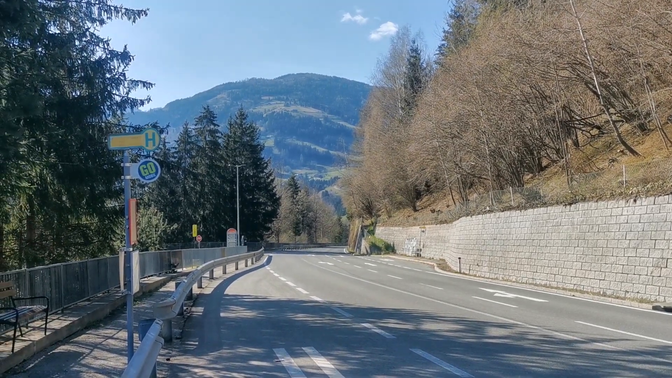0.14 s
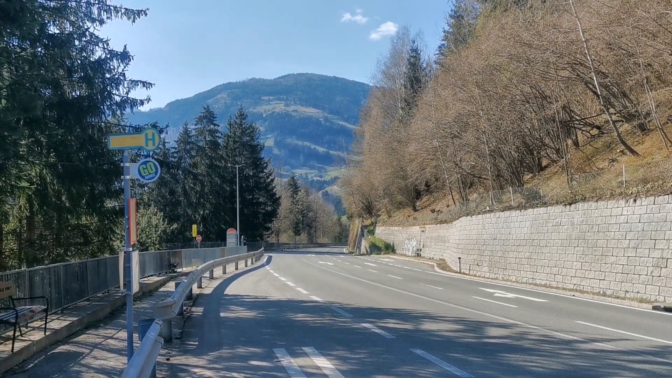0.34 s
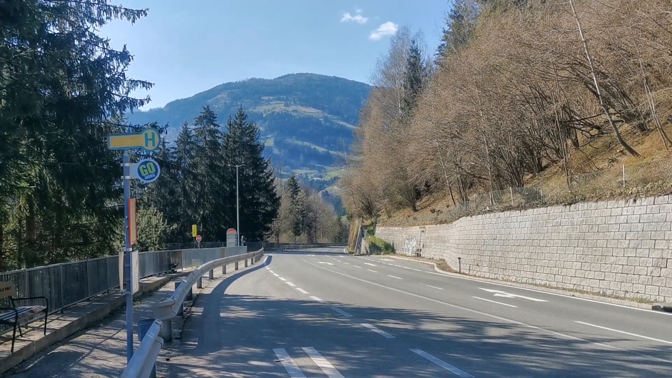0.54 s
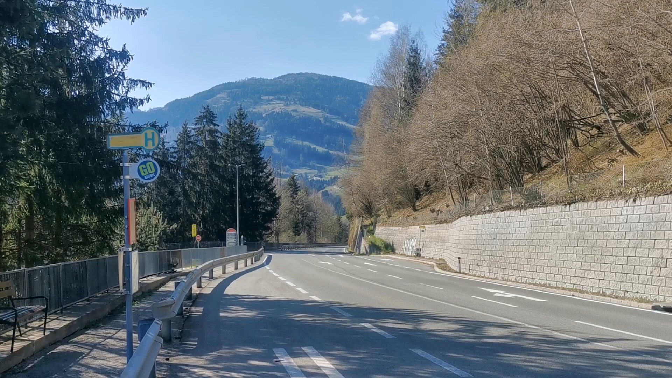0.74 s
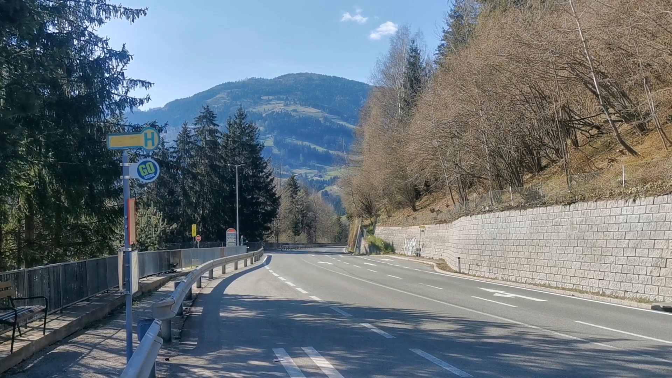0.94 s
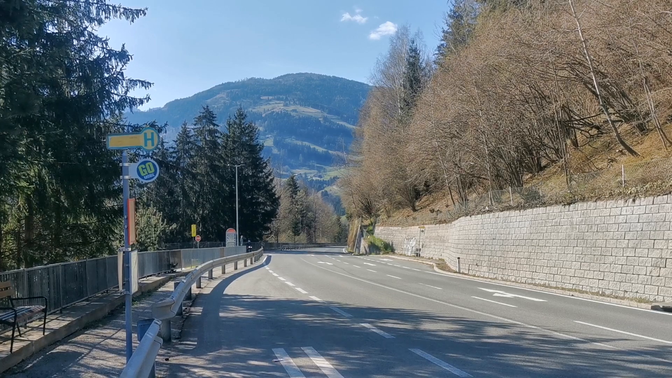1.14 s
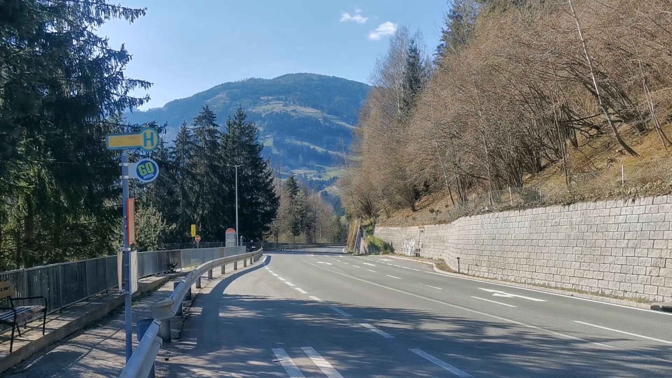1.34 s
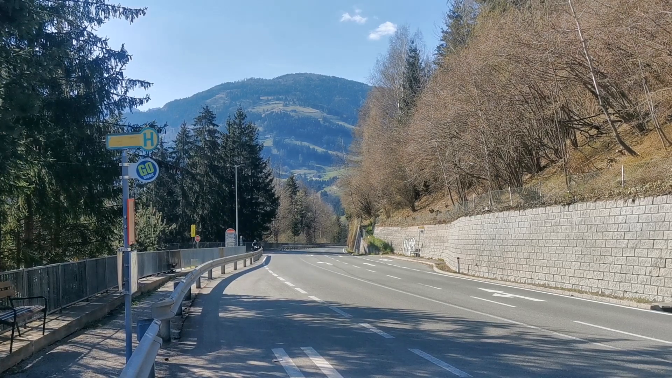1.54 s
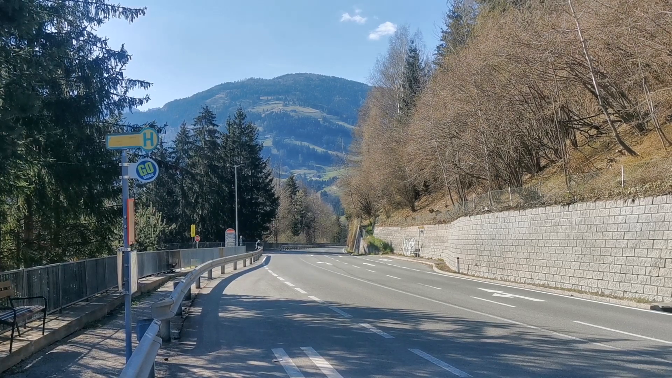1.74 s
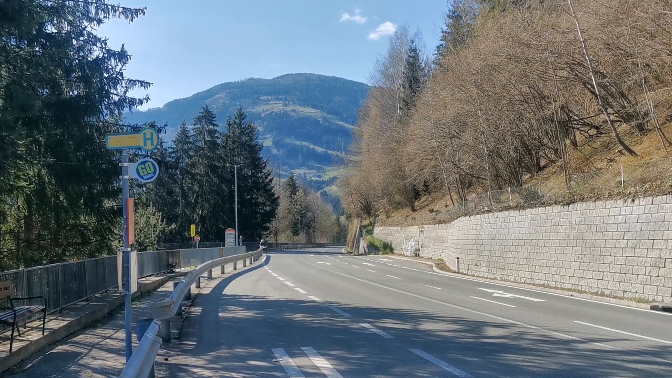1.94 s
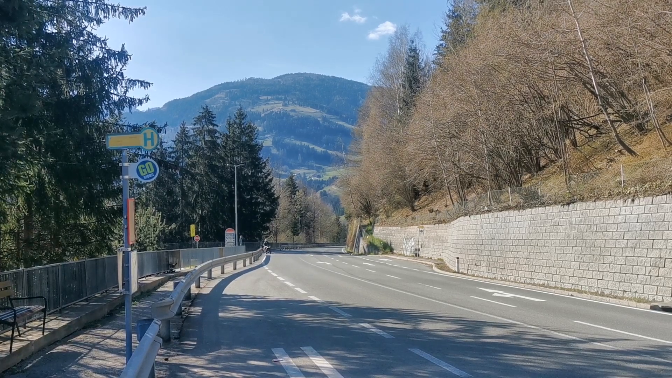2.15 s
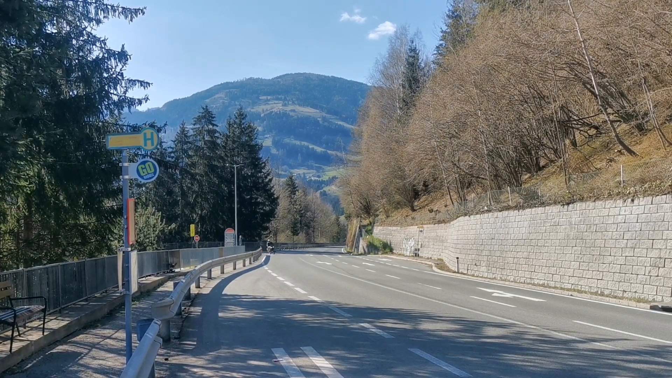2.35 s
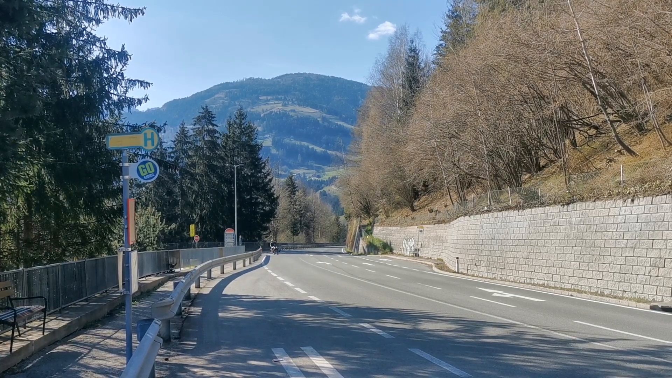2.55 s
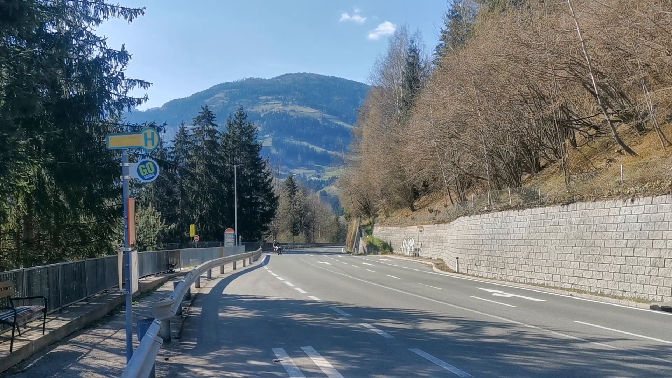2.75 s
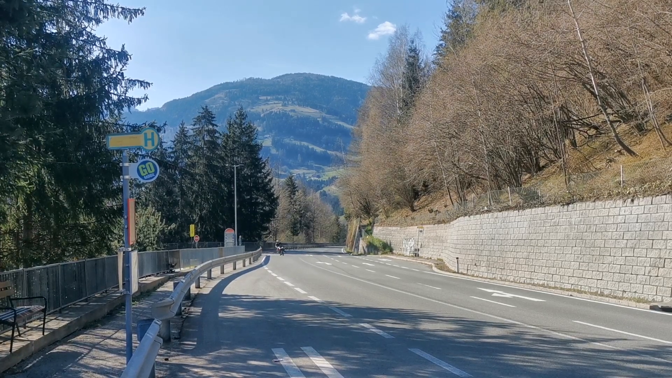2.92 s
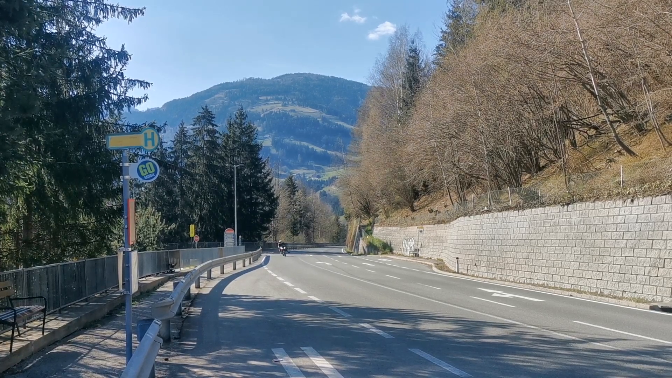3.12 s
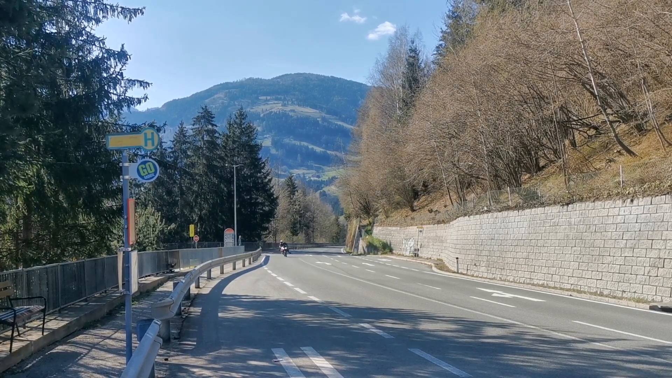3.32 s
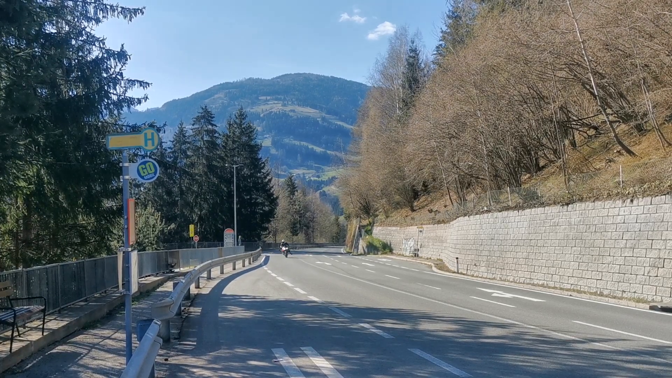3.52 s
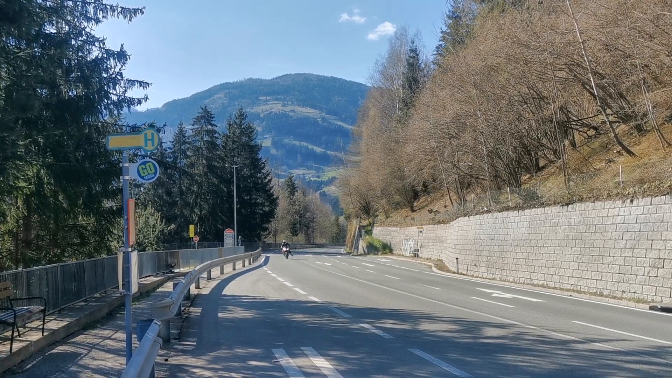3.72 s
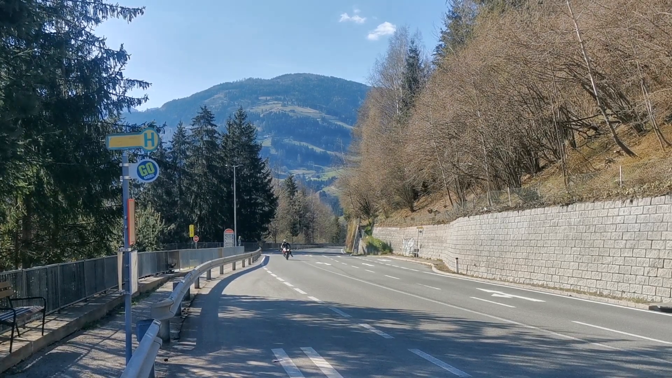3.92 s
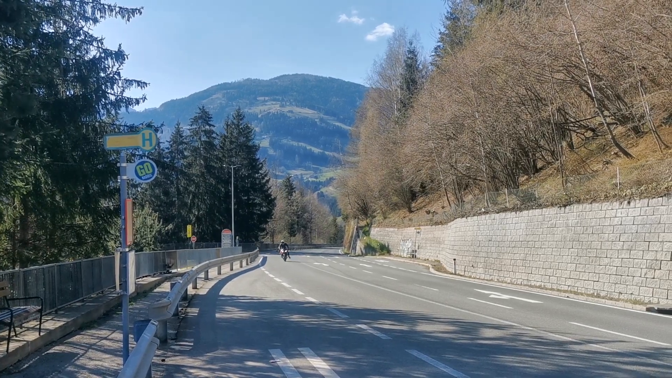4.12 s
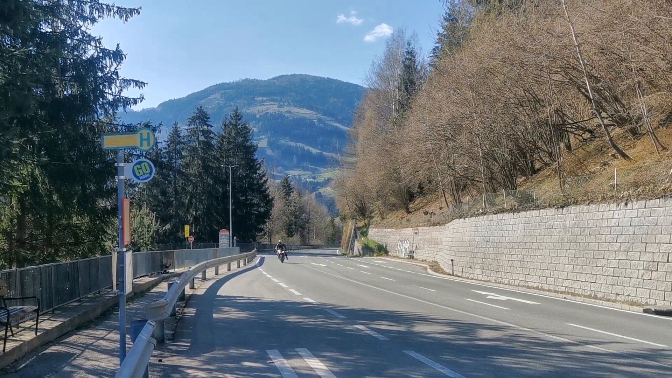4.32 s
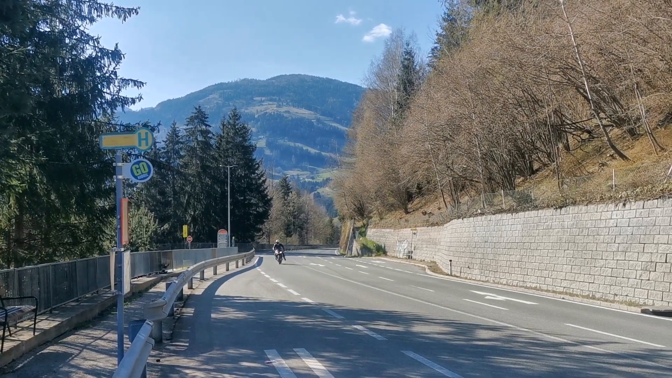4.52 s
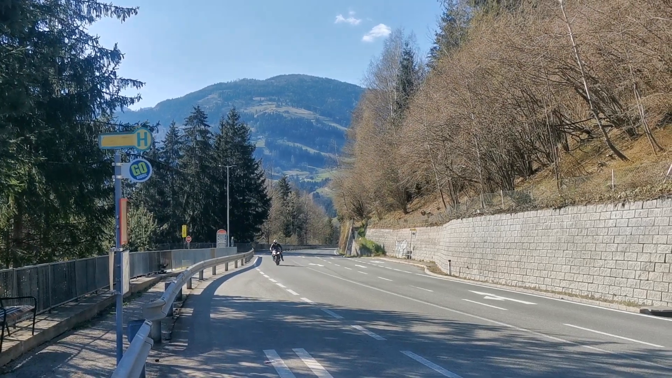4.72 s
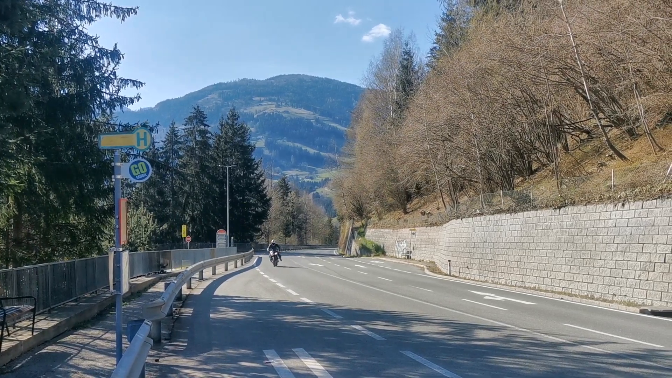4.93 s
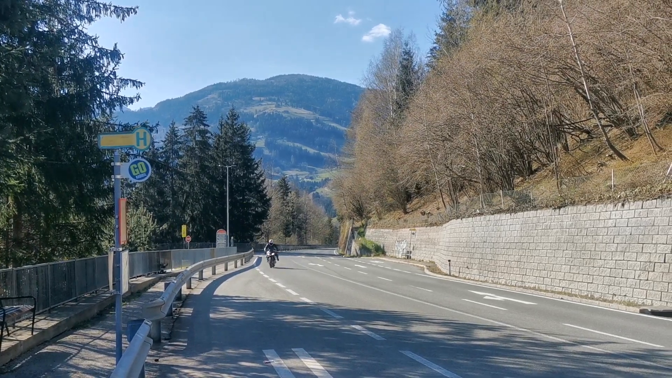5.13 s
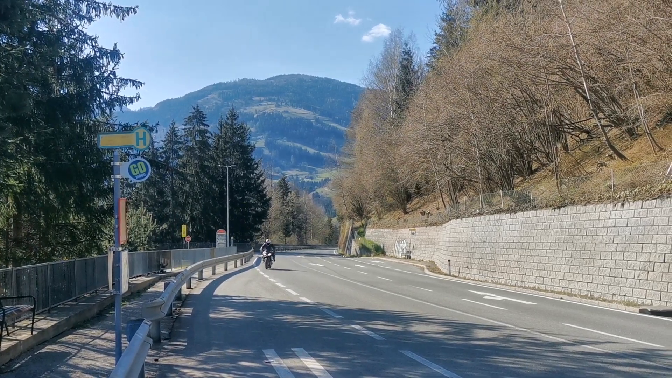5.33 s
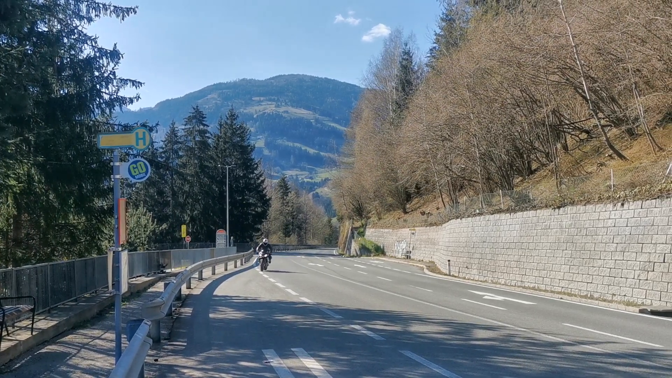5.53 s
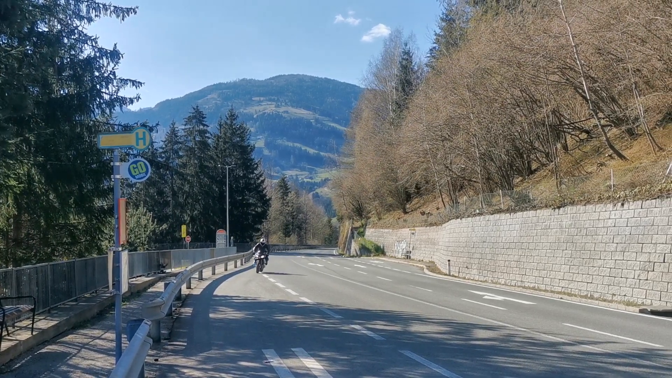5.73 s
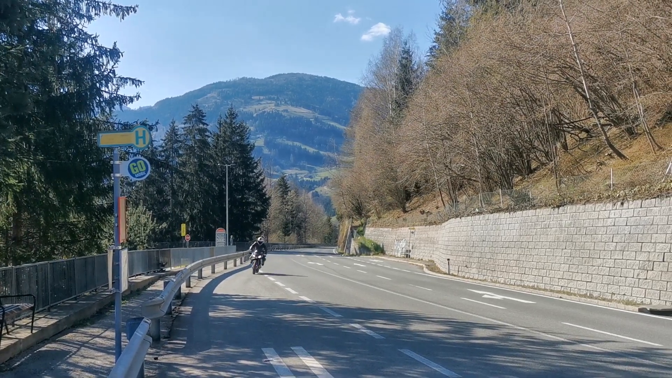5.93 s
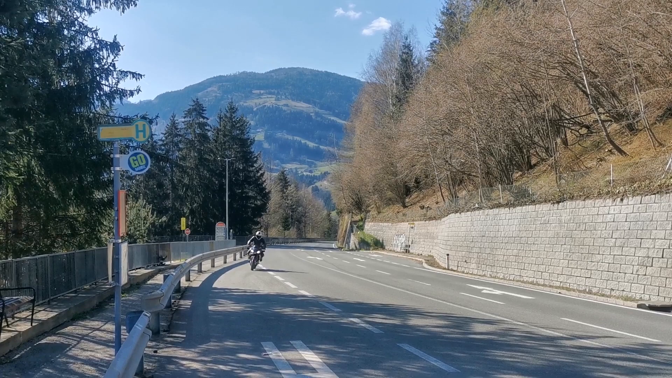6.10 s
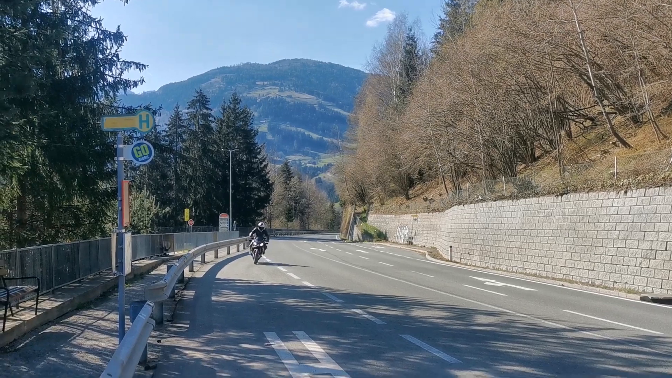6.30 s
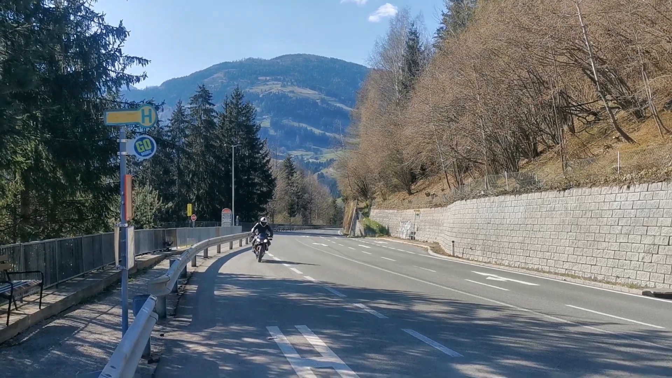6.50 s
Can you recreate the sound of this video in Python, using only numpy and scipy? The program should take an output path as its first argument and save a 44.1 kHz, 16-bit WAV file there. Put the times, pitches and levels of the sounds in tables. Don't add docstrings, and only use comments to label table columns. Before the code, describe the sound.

A hand-held stereo microphone at the roadside first catches quiet valley air, low wind rumble, a tiny bird note and a faint engine throb. The motorcycle comes closer, rising steadily to a loud barking pull under heavy wind thumps. After the throttle closes, the exhaust note falls, burbling and crackling, with mechanical whine and rushing tyres, still approaching at the end.

```python
import sys
import numpy as np
from scipy import signal
from scipy.fft import rfft, irfft, next_fast_len
from scipy.io import wavfile
from scipy.ndimage import uniform_filter1d, map_coordinates

SR = 44100
rng = np.random.default_rng(int(sys.argv[2]) if len(sys.argv) > 2 else 0)


def rack_gain(trim_db):
    fader = np.asarray(trim_db, float)
    return 10 ** (fader / 20)


def transcribe(signal):
    frames = np.atleast_2d(signal).T
    limited = np.clip(frames, -1, 1)
    pcm = np.round(limited * 32767).astype(np.int16)
    wavfile.write(sys.argv[1], SR, pcm)


N = 289296

# frequency in Hz, level in dB per Hz.
AIR_SPECTRUM = [(300, -25.5), (500, 0.5), (900, 1), (1400, -7), (1750, -0.5), (2500, -8), (4500, -17),
                (7500, -32), (11000, -28), (15500, -29.5)]
# start in seconds, level in dB, pitch in Hz, decay in cycles, left over right in dB.
TWIG_TICKS = [
    (1.0345, -55, 4800, 2.5, -13),
    (1.04, -37, 2100, 1.1, -1),
    (1.0412, -41, 3900, 2.3, -14),
    (2.875, -38, 11400, 5.2, -10),
]
# start in seconds, length in seconds, pitch in Hz, level in dB.
BIRD_NOTES = [
    (0.037, 0.073, 3670, -65.5),
    (1.56, .03, 8100, -80),
]

# centre in seconds, length in seconds, peak in dB.
LEFT_GUSTS = [(0, .15, -30.5), (1.5, .3, -43), (1.8, 0.35, -49), (2.2, 0.18, -48), (2.66, 0.3, -41),
              (3.06, 0.15, -26), (3.19, 0.29, -29), (3.37, 0.15, -27.5), (3.68, 0.16, -30),
              (3.92, 0.097, -31), (4.16, 0.29, -29.5), (4.78, .22, -32), (5.16, 0.12, -34),
              (5.39, 0.29, -34.5), (5.65, 0.4, -30), (5.9, 0.58, -35), (6.33, 0.9, -35)]
RIGHT_GUSTS = [(.08, 0.34, -27), (.25, 0.29, -29.5), (1.5, 0.1, -39), (1.71, 0.22, -49), (2.22, 0.34, -42),
               (2.64, 0.15, -48), (2.89, 0.17, -32), (3.09, 0.34, -32), (3.41, 0.077, -13),
               (3.53, 0.39, -24), (3.7, 0.38, -21.5), (3.84, 0.11, -29), (3.99, 0.14, -19),
               (4.32, 0.2, -29), (4.72, 0.33, -31.5), (5.02, .22, -33.5), (5.38, 0.49, -38),
               (6.46, .3, -59)]
# centre in seconds, length in seconds, peak in dB.
RIGHT_SLAPS = [
    (3.376, 0.043, -29),
    (3.404, 0.055, -17),
    (3.425, 0.02, -13.5),
]
# frequency in Hz, level in dB per Hz.
RUMBLE_SPECTRUM = [(10, -18), (30, -6.5), (60, -5), (120, -6.5), (200, -14), (320, -17.5), (600, -61),
                   (2000, -120)]
FLAP_SPECTRUM = [(60, -30), (150, -8), (270, 8), (450, 1), (700, -6), (1100, -23), (1600, -50.5),
                 (4000, -120)]

# frequency in Hz, left minus right in dB.
PORT_LEAN = [(60, 2), (120, 6.5), (250, 3), (520, 0), (1060, 2), (2170, 7), (4450, 2.5), (6500, 5),
             (8500, 19.5), (13000, -6)]
# frequency in Hz, left-right likeness from 0 to 1.
PORT_LIKENESS = [(300, 1), (700, 0.68), (1300, 0.65), (2400, 0.38), (4400, 0.58), (8000, 0.17)]
# frequency in Hz, lead of the left port in radians.
PORT_LEAD = [(0, 0), (900, .2), (1380, 1.5), (1700, .4), (2150, 1.5), (2600, 7), (3100, 11.2), (3800, 12.5),
             (4650, 13.3)]

# centre in seconds, length in seconds, pitch in Hz, peak in dB.
WHINES = [
    (3.55, .9, 4000, -57),
    (2.8, .7, 3700, -65),
    (4.25, 2.4, 1900, -51),
    (4.7, 1.4, 3850, -61),
    (1.22, .8, 2750, -62),
    (4.65, .8, 8200, -76),
    (5.8, 2.2, 2750, -55),
    (5.6, 1.2, 8200, -74),
    (5.7, .9, 1000, -57),
    (6.35, 1.2, 1080, -55),
]
# time in seconds, level in dB, brightness in dB.
ROAR_COURSE = [(0, -79, 6.5), (.6, -66, -6), (.92, -70.5, 1), (1.05, -58, -6.5), (1.5, -57, -6),
               (1.8, -65, -3.5), (2.5, -61, 1), (2.95, -49.5, -0.1), (3.33, -48.5, -4.5), (3.44, -55, -3),
               (3.6, -53, 7), (4, -45, -3), (4.2, -50.5, -2.5), (4.5, -49.5, -1), (4.9, -46, -0.8),
               (5.4, -46.5, 3), (5.65, -46.5, 7), (6.56, -47, 1.5)]
# frequency in Hz, level in dB per Hz.
RATTLE_SPECTRUM = [(900, -20.5), (1150, -6), (1450, -4.5), (1880, 0), (2270, -7.5), (2600, -7.5),
                   (3100, -18), (3770, -11.5), (4600, -11.5), (5500, -21), (6600, -19), (7600, -29),
                   (8300, -28.5), (10000, -34), (15500, -50)]
# frequency in Hz, width in Hz, gain in dB.
NOISE_RINGS = [(1780, 510, -1), (2995, 1100, 15), (3864, 130, 6), (7950, 140, -2), (985, 60, 1.5)]

# time in seconds, engine cycles a second.
REVS = [(0.0, 17.8), (0.4, 19.6), (0.58, 20.2), (0.8, 19.2), (1.0, 19.1), (1.25, 19.8), (1.75, 21.6),
        (2.2, 23.8), (2.4, 25.2), (2.6, 27.4), (3.0, 31.9), (3.55, 39.3), (3.85, 43.3), (4.0, 45.3),
        (4.11, 46.3), (4.22, 44.9), (5.65, 34.1), (6.56, 28.1)]
# time in seconds, exhaust
# level in dB, throttle bark in dB.
DRIVE = [(0, -38.5, -74), (.6, -34.5, -69), (1.2, -37, -64.5), (1.9, -37, -61.5), (2.35, -34, -59.5),
         (2.62, -31, -53.5), (3.0, -26, -51.5), (3.3, -23, -41), (3.4, -25.5, -46.5), (3.46, -29, -42),
         (3.58, -26, -31), (3.85, -22, -31.5), (4.11, -23.5, -30.5), (4.18, -33, -49), (4.3, -20.5, -49),
         (5.3, -22.5, -50.5), (5.55, -18.5, -40.5), (6.56, -22.5, -51.5)]
# time in seconds, peak in dB.
FUEL_POPS = [(4.278, -41), (4.331, -45), (4.422, -34), (4.485, -48.5), (4.532, -42.5), (4.628, -41),
             (4.767, -38.5), (4.84, -41), (4.89, -33.5), (5.042, -45), (5.097, -47.5), (5.15, -36.5),
             (5.202, -45), (5.283, -51), (5.427, -40), (5.475, -40.5), (5.532, -52), (5.591, -32.5),
             (5.648, -39.5), (5.736, -38), (5.798, -40), (5.859, -44), (5.915, -42), (5.983, -40),
             (6.076, -32.5), (6.14, -34.5), (6.271, -42.5), (6.317, -34), (6.425, -29), (6.523, -37)]
ORDER_PATTERN = [-15, -5, 0, 0, 0, -14.5, 0, 0, 0.5, 0, -3.5, 6.5, 3, -4, 6, 0.5, 5, -6, -4, 3.5, 2.5, -14,
                 -8.5, 0, -1.5, -18.5, -3.5, -1]
# order, level pulling in dB, level coasting in dB, dB gained per dB of bark.
STRONG_ORDERS = [(3, -3.5, -5.5, 0.2), (4, -6.5, 1.66, 0.11), (5, 0.8, 1.27, 0.09), (7, -8, -11, 0.12),
                 (8, -3, -17.5, 0.15)]
# frequency in Hz, gain in dB.
PULLING_PIPE = [(60, -15), (100, -5), (150, 2.5), (180, -3.5), (220, 0.8), (260, 1), (305, -10),
                (350, -6.5)]
COASTING_PIPE = [(85, 2.5), (108, -18.5), (153, -0.2), (187, -11.5), (236, -4.5), (260, -12), (282, 1.5),
                 (335, -7.5)]
# frequency in Hz, level in dB.
SILENCER = [(15, -20), (60, -5.5), (150, 4.5), (210, -4.5), (260, -5.5), (330, -6), (390, -13.5),
            (470, -30.5), (1200, -120)]
BARK_SPECTRUM = [(300, -25.5), (480, -8), (600, 3.5), (690, 2.5), (800, -3), (1000, -6), (1150, -12),
                 (1500, -54.5)]
BURBLE_SPECTRUM = [(30, -38.5), (90, -13.5), (160, -1.8), (230, -10), (300, -15.5), (400, -28.5),
                   (3000, -120)]
RUSH_SPECTRUM = [(200, -64.5), (450, -5.5), (670, 3), (850, 0), (1000, 0.5), (1250, -7), (1600, -32),
                 (4000, -120)]

SHUT_S, SHUTTING_S = 4.14, 0.027
SECOND_BLOW = 3 / 8


def unit(x):
    return x / np.sqrt(np.mean(x ** 2) + 1e-20)


def along(points, hz):
    f, v = np.transpose(points)
    return np.interp(np.log(hz + 1), np.log(f + 1), v)


def curves(rows):
    s, *cols = np.transpose(rows)
    return [np.interp(np.arange(N) / SR, s, c) for c in cols]


def wobble(rate):
    knots = rng.standard_normal(int(N * rate / SR) + 4)
    return map_coordinates(knots, [np.arange(N) * rate / SR])


def swells(rows, floor_db):
    t = np.arange(N) / SR
    bells = sum(rack_gain(db - 80 * ((t - s) / length) ** 2) for s, length, db in rows)
    return 20 * np.log10(rack_gain(floor_db) + bells)


def filtered(x, response):
    m = next_fast_len(N + 8192)
    return irfft(rfft(x, m) * response(np.fft.rfftfreq(m, 1 / SR)), m)[..., :N]


def coloured(x, spectrum):
    return unit(filtered(x, lambda hz: rack_gain(along(spectrum, hz))))


def patchy(depth_db):
    z = signal.stft(rng.standard_normal((2, N + 512)), nperseg=512)[2]
    field = uniform_filter1d(rng.standard_normal(z.shape[1:]), size=5, axis=0)
    field = uniform_filter1d(field, size=14, axis=1)
    return signal.istft(z * rack_gain(depth_db * unit(field)), nperseg=512)[1][:, :N]


def wayside():
    out, t = np.zeros((2, N + SR)), np.arange(SR // 5) / SR
    for s, db, hz, life, pan_db in TWIG_TICKS:
        start = round(s * SR)
        envelope = np.exp(-t * hz / life) * (1 - np.exp(-t * hz * 2))
        tick = rack_gain(db) * envelope * np.sin(2 * np.pi * hz * t)
        out[:, start:start + len(t)] += tick * rack_gain([[pan_db / 2], [-pan_db / 2]])
    for s, length, hz, db in BIRD_NOTES:
        start = round(s * SR)
        swell = np.sin(np.pi * np.clip(t / length, 0, 1))
        out[:, start:start + len(t)] += rack_gain(db) * swell * np.sin(2 * np.pi * hz * t * (1 - 0.11 * t))
    return out[:, :N] + rack_gain(-60.5) * coloured(rng.standard_normal((2, N)), AIR_SPECTRUM)


def gust(spectrum, lump_db, rate):
    return unit(rack_gain(lump_db * wobble(rate)) * coloured(rng.standard_normal(N), spectrum))


def wind():
    left_db = swells(LEFT_GUSTS, floor_db=-58)
    right_db = swells(RIGHT_GUSTS, floor_db=-56)
    flap_db = swells(RIGHT_SLAPS, floor_db=right_db - 18)
    flap = rack_gain(flap_db + .6) * np.clip((flap_db + 48) / 8, 0, 1)
    left = rack_gain(left_db + 5.5) * gust(RUMBLE_SPECTRUM, lump_db=2, rate=14)
    right = rack_gain(right_db + .6) * gust(RUMBLE_SPECTRUM, lump_db=2.5, rate=14)
    right = right + flap * gust(FLAP_SPECTRUM, lump_db=2.5, rate=40)
    return np.array([left, right])


def at_ports(pair):
    def mix(hz):
        turn = np.arccos(np.clip(along(PORT_LIKENESS, hz), 0, 1)) / 2
        return np.array([np.cos(turn), np.sin(turn)])

    side = np.array([[.5], [-.5]])
    common, other = filtered(pair, mix)
    return filtered(np.array([common + other, common - other]),
                    lambda hz: rack_gain(side * along(PORT_LEAN, hz)) * np.exp(1j * side * along(PORT_LEAD, hz)))


def whines():
    def band(c):
        noise = rng.standard_normal((2, N))
        return unit(filtered(noise, lambda hz: 1 / (1 + (2 * (hz - c) / (.09 * c)) ** 2)))

    return sum(rack_gain(swells([(s, length, db)], floor_db=-120)) * band(hz) for s, length, hz, db in WHINES)


def roar(cycle):
    level_db, bright_db = curves(ROAR_COURSE)
    chain_db, valve_db = -3 + 0.31 * bright_db, -5.5 + bright_db
    air_db = -15 + 0.88 * bright_db + .2 * (level_db + 53.5)
    rings = lambda hz: sum(db / (1 + (2 * (hz - c) / w) ** 2) for c, w, db in NOISE_RINGS)
    singing = rack_gain(0.64 * wobble(1.8))
    plain = filtered(patchy(1.0), lambda hz: rack_gain(along(RATTLE_SPECTRUM, hz)))
    noise = plain + singing * filtered(plain, lambda hz: rack_gain(rings(hz)) - 1)
    band = lambda low, high: unit(filtered(noise, lambda hz: (hz >= low) & (hz < high)))
    mix = band(0, 2250)
    mix = mix + rack_gain(chain_db) * band(2250, 3200)
    mix = mix + rack_gain(valve_db) * band(3200, 5100)
    mix = mix + rack_gain(air_db) * band(5100, SR / 2)
    throb = 1 + 0.049 * np.cos(4 * np.pi * cycle)
    return rack_gain(level_db + 0.3 * wobble(8.9)) * throb * mix


def on_throttle(pulling, coasting):
    shut = np.clip((np.arange(N) / SR - SHUT_S) / SHUTTING_S, 0, 1)
    return (1 - shut) * pulling + shut * coasting


def firing_orders(rate, cycle, level_db, bark_db):
    upper_db = 0.84 * (level_db + 30.5) + on_throttle(-45, -53.5)
    bright_db = 0.88 * np.maximum(bark_db + 43.0, -24) - 57 + on_throttle(0, -6)
    light = np.clip((-40 - bark_db) / 12, 0, 1)
    strong = {}
    for k, pull_db, coast_db, gains in STRONG_ORDERS:
        pulling_db = pull_db + gains * (bark_db + 41) + along(PULLING_PIPE, k * rate)
        strong[k] = level_db + on_throttle(pulling_db, coast_db + along(COASTING_PIPE, k * rate))
    tone = np.zeros(N)
    for k, pattern_db in enumerate(ORDER_PATTERN, start=1):
        if k in strong:
            size = rack_gain(strong[k])
        else:
            muffled = rack_gain(upper_db + 0.5 + along(SILENCER, k * rate))
            size = rack_gain(pattern_db) * (muffled + rack_gain(bright_db + along(BARK_SPECTRUM, k * rate)))
        smear = np.angle(1 + .9 * np.exp(-2j * np.pi * k * SECOND_BLOW)) + 1.7 * np.sin(1.7 * k)
        drift = .005 * k * wobble(7) + .03 * k * wobble(1.5)
        size = size * rack_gain(light * (.9 + .06 * k) * wobble(16)) * rack_gain(.08 * k * wobble(6))
        tone -= np.sqrt(2) * size * np.cos(2 * np.pi * k * cycle + smear + drift)
    return tone


def fuel_pops():
    pops = np.zeros(N)
    for s, db in FUEL_POPS:
        pops[round((s + .005) * SR)] = rack_gain(.5 * (db + 36))
    return pops


def burble(cycle, level_db, pops):
    blows = np.zeros(N)
    for offset in (0, SECOND_BLOW):
        fired = np.flatnonzero(np.diff(np.floor(cycle - offset)))
        blows[fired] = .3 * rng.standard_normal(len(fired))
    uneven_db = on_throttle(level_db - 16 + 0.5 * wobble(15), -34.5)
    return rack_gain(uneven_db + 5.0) * coloured(blows + 0.35 * pops, BURBLE_SPECTRUM)


def gas_rush(cycle, bark_db, pops):
    flash = signal.fftconvolve(pops, np.hanning(round(.016 * SR)), "same")
    size = rack_gain(np.minimum(bark_db + 3.5, 0.098 * bark_db - 40))
    pulse = 1 + 0.1 * np.cos(4 * np.pi * cycle)
    return size * pulse * (.75 + 1.4 * flash) * coloured(rng.standard_normal(N), RUSH_SPECTRUM)


def exhaust(rate, cycle):
    level_db, bark_db = curves(DRIVE)
    pops = fuel_pops()
    tone = firing_orders(rate, cycle, level_db, bark_db)
    return tone + burble(cycle, level_db, pops) + gas_rush(cycle, bark_db, pops)


def scene():
    rate, = curves(REVS)
    cycle = np.cumsum(rate) / SR
    pipe = exhaust(rate, cycle) * np.minimum(np.arange(N) / 150, 1)
    wall = rack_gain(-7) * np.pad(pipe, (300, 0))[:N]
    machine = np.array([pipe, wall]) + roar(cycle) + whines()
    return at_ports(machine) + wind() + wayside()


def roll_off(x):
    return signal.sosfilt(signal.butter(12, 15740, fs=SR, output="sos"), x)


def record(dry):
    soft = dry / (1 + np.abs(dry / .8) ** 4) ** (1 / 4)
    return roll_off(soft)


dry = scene()
out = record(dry)
transcribe(out)
```